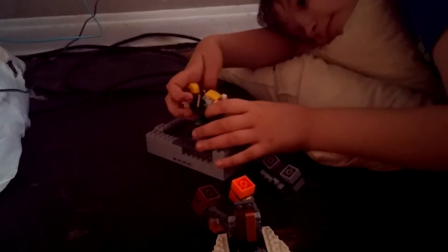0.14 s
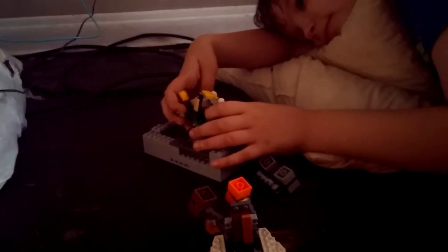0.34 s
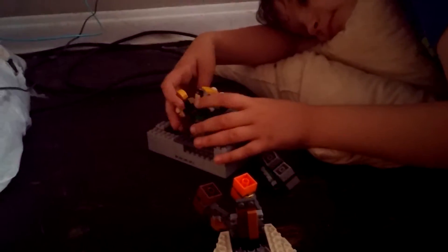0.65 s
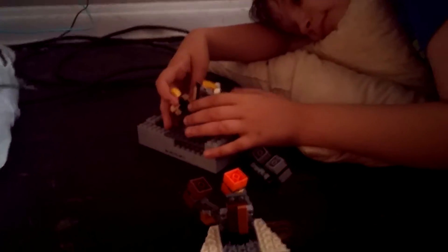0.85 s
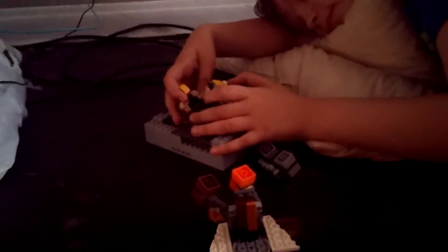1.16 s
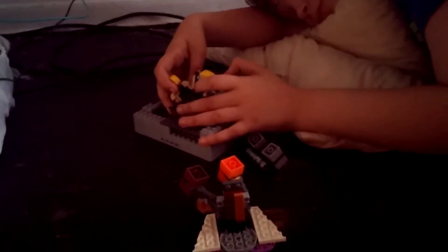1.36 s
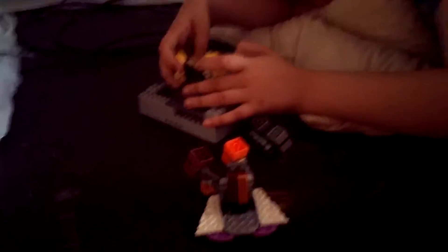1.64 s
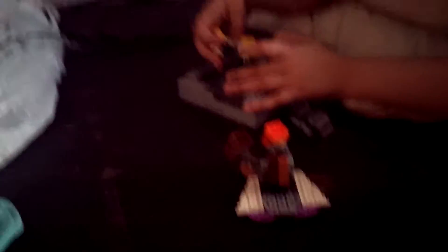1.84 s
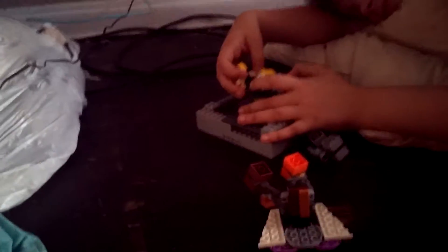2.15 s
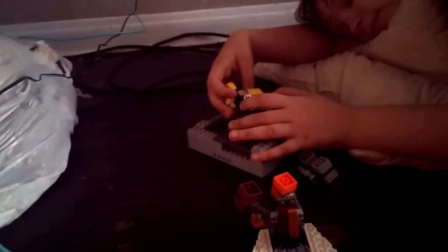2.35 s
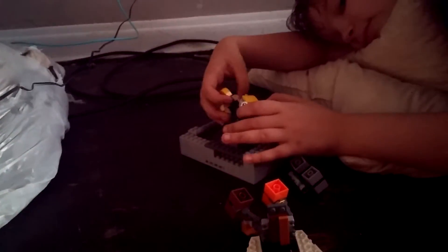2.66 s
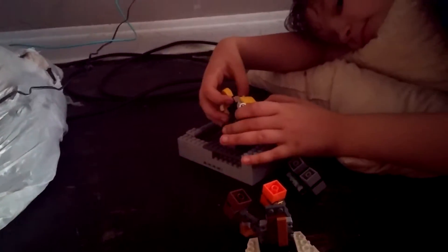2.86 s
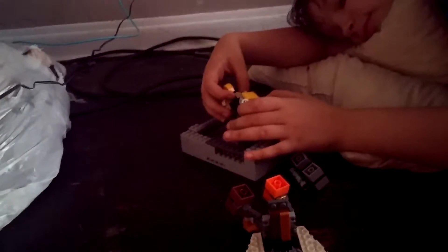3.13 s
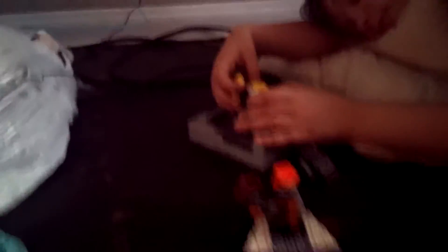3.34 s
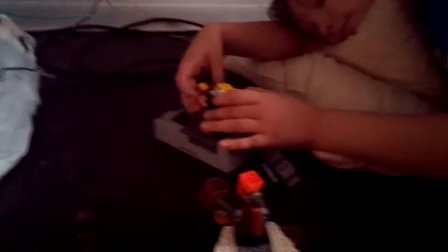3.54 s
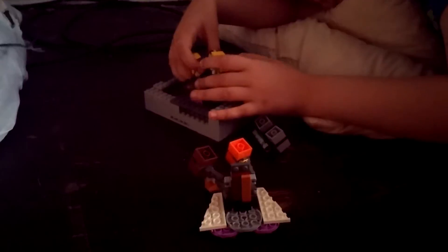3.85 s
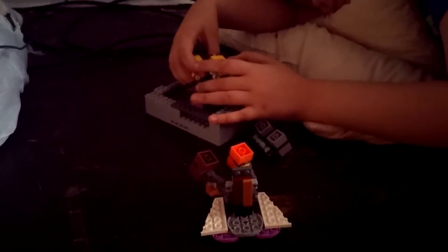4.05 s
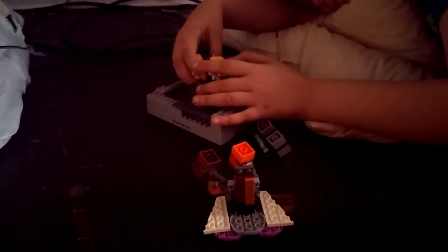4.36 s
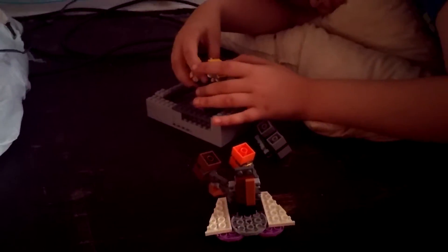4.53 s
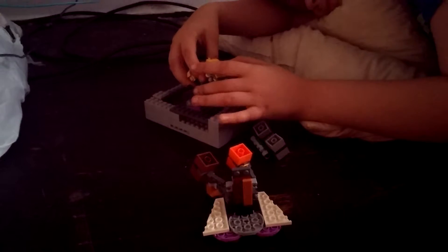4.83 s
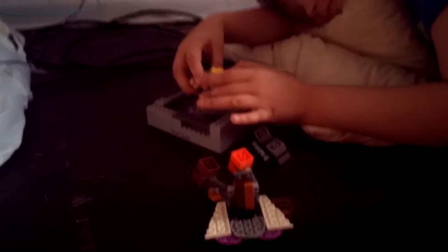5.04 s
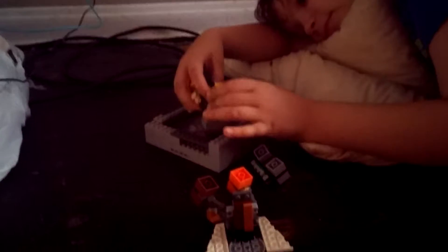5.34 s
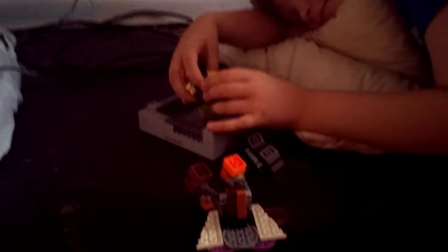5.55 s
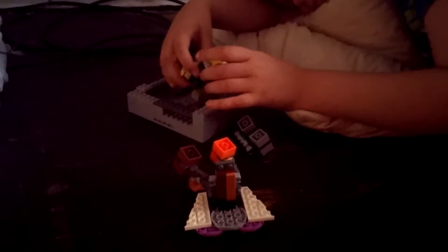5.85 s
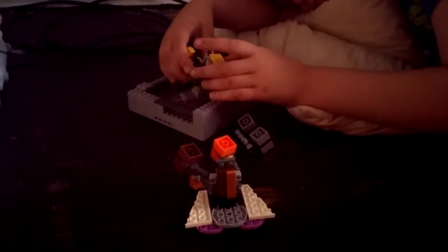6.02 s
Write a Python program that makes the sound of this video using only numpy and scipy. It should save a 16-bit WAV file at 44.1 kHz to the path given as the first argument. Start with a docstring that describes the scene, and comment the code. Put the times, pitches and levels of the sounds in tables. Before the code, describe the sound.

Over the soft, low hum of a fan and a thin hiss, plastic building bricks tick, scrape and snap together in uneven clusters, each with a slight hollow ring. Midway the clicking thins out, and dull thumps, two louder knocks and finger rubbing come from the handheld microphone, close and to the right. A few more brick snaps follow. The room sounds small and fairly dry.

```python
"""Small plastic bricks pressed onto a hollow model on the floor of a small room: snaps, ticks, scrapes.
Each contact is a chatter of edges that rings the model; studs slide and catch under the fingers.
The hand holding the camera bumps and rubs its right microphone port.
Behind it, a thin hiss rings in both ports and a fan hums low."""
import sys
import numpy as np
from scipy import signal
from scipy.fft import rfft, irfft, next_fast_len
from scipy.io import wavfile
from scipy.ndimage import map_coordinates

SR = 44100
rng = np.random.default_rng(int(sys.argv[2]) if len(sys.argv) > 2 else 0)


def log_audio(samples):
    """Write samples as a 16-bit WAV file to the path given in sys.argv[1]."""
    # one column per channel
    frames = np.atleast_2d(samples).T
    # limit to full scale, then quantise
    limited = np.clip(frames, -1, 1)
    pcm = np.round(limited * 32767).astype(np.int16)
    wavfile.write(sys.argv[1], SR, pcm)


N = 272979

# room decay: freq_hz, t60_s
ROOM_DECAY = [(200, 0.3), (2000, 0.15), (8000, 0.16), (15000, 0.049)]
# fan motor lines: freq_hz, level_db
FAN_LINES = [(59.2, -62), (80.7, -58.5), (83.2, -55), (118.5, -70.5), (166.9, -68.5), (296, -75.5),
             (339, -76.5)]
# hiss envelope: time_s, level_db
HISS_ENVELOPE = [(0.0, -48), (0.27, -45.5), (0.48, -59.5), (0.76, -58), (0.96, -48.5), (1.28, -51.5),
                 (1.62, -56.5), (2.1, -57.5), (2.52, -59.5), (2.69, -80.5), (3.1, -76), (3.33, -82.5),
                 (3.55, -77), (3.69, -69.5), (3.79, -66.5), (3.93, -51.5), (4.02, -55), (4.33, -79),
                 (4.98, -71.5), (5.22, -60), (5.74, -55.5), (5.84, -52), (6.19, -49.5)]
# right port resonance, sinks and returns: time_s, freq_hz
PORT_RESONANCE = [(0, 10220), (.8, 10230), (.95, 10020), (1.3, 10230), (2.1, 10220), (2.62, 9180),
                  (2.9, 9560), (3.15, 9320), (3.5, 9450), (3.9, 10200), (4.4, 10300), (6.19, 10250)]
# background spectra: freq_hz, density_db
FAN_AIR_SPECTRUM = [(20, -11.5), (45, 0), (80, 4), (130, -4.5), (200, -6.5), (310, -7), (450, -23.5),
                    (800, -22.5), (1500, -48.5), (5000, -47.5), (16000, -54.5)]
HISS_LEFT_SPECTRUM = [(1000, -20.5), (5000, -24), (6800, -10.5), (8100, 0.5), (9200, -4.5), (11500, -15.5),
                      (16000, -13.5)]
HISS_RIGHT_SPECTRUM = [(1000, -15.5), (5000, -24), (6800, -9), (8100, -5.5), (9700, 6), (11500, -4),
                       (13500, -11.5), (16000, -16)]

# bumps on the camera body: start_s, level_db, pitch_hz, t60_s, skin_db
BODY_BUMPS = [(1.611, -37, 101, 0.098, -73), (1.862, -15, 110, 0.073, -50), (2.297, -21.5, 111, 0.14, -47),
              (3.517, -18, 107, 0.091, -49), (3.812, -22.5, 144, 0.068, -47.5),
              (3.892, 1.5, 190, 0.012, -51), (4.0508, -1, 260, 0.006, -27)]
# finger rubs at the right port: centre_s, sigma_s, level_db, drag_rel_db, crunch_rel_db
FINGER_RUBS = [(3.931, 0.022, -39.5, 7, -7.5), (3.962, 0.028, -36.5, -4, -0.5),
               (4.035, 0.014, -36, -6.5, 9.5), (4.051, .002, -39, 15, -4), (4.306, 0.0065, -46, -16, 7),
               (4.443, 0.012, -62, -5.5, -16), (4.606, 0.018, -28, -11.5, -11),
               (4.641, .04, -46, -10.5, -26)]
# finger squeaks: centre_s, level_db, pitch_hz, octave_rel_db
FINGER_SQUEAKS = [(1.868, -39, 1094, -22), (3.526, -30, 1067, 0)]
# dry ticks of the case: start_s, level_db
CASE_TICKS = [(4.163, -21), (4.624, -16), (4.637, -12.5), (4.643, -10), (4.669, -15)]
# friction spectra of the grip: freq_hz, density_db
SKIN_SPECTRUM = [(200, -9), (1000, -11), (2400, 1.5), (4500, -11), (7000, -3), (9500, -1.5), (12000, -9),
                 (16000, -18)]
DRAG_SPECTRUM = [(25, -10.5), (120, 5), (300, -11), (700, -6.5), (1100, -11.5), (2500, -32.5)]
CRUNCH_SPECTRUM = [(1200, -19.5), (2200, -3.5), (2900, 2.5), (4300, -6), (6000, -13), (10000, -28.5)]
SIZZLE_SPECTRUM = [(1500, -43), (2600, -19), (3500, -76), (6000, -15), (8000, -2.5), (10000, -1),
                   (12000, -10), (16000, -26.5)]

# strokes of studs over studs: centre_s, sigma_s, level_db, resonance_hz
STUD_STROKES = [(0.013, 0.033, -23, 1840), (0.202, 0.021, -41, 1310), (0.282, 0.098, -54, 2760),
                (0.747, 0.0079, -48, 1970), (0.898, 0.027, -37.5, 1960), (1.088, 0.033, -46.5, 1892),
                (1.907, 0.01014, -39.5, 3400), (2.919, 0.007, -47, 2830), (3.787, 0.017, -44, 2760),
                (5.02, .0065, -53.5, 1370), (5.518, 0.044, -58.5, 1390), (5.78, 0.021, -51, 1660),
                (5.894, 0.027, -46, 1850)]
# brick presses: snap_s, level_db, hollow_rel_db, ring_hz, slide_s (touch to snap; 0 = plain tap)
BRICK_PRESSES = [(0.0175, -12, -7.5, 2120, 0), (0.0615, -24.5, 5.5, 1903, 0.014),
                 (0.1479, -32.5, 3, 1545, 0.00024), (0.19, -19, -4, 1543, 0.001),
                 (0.3461, -29.5, -0.5, 1840, .008), (0.4389, -41, -8, 1885, 0),
                 (0.9362, -23, -4.5, 1704, .0135), (1.185, -17.5, -4.5, 1827, 0.0025),
                 (1.2349, -29.5, -1.5, 1402, .031), (1.3504, -10, -19, 1955, .02),
                 (1.4381, -27.5, -14, 2110, .01), (1.9346, -24.5, -4.5, 1800, 0.0025),
                 (2.0718, -35, -16, 1750, 0), (2.1014, -14.5, -12.5, 1430, .008),
                 (2.141, -13, -2.5, 1845, 0.026), (2.4546, -13.5, -16.5, 1290, .0095),
                 (2.4655, -10.5, -9, 2150, 0), (2.6737, -42, 0, 1870, 0), (2.8662, -59, -3, 1450, 0),
                 (3.0847, -67, -15, 1444, 0), (3.7463, -60, -15, 2460, 0.00098),
                 (4.0384, -25.5, -3.5, 1487, 0.022), (4.131, -30.5, -9, 1455, 0.00046),
                 (4.2825, -40, -6.5, 1550, 0.00029), (4.3016, -38, -4.5, 1510, 0),
                 (5.1056, -24, 1, 2034, .0095), (5.287, -56.5, -3, 1360, 0),
                 (5.333, -57, -17, 1600, 0.00032), (5.4335, -26, 1.5, 2174, .01),
                 (5.593, -41, -16, 1780, 0.00023), (5.708, -36, -9, 1520, 0.00051),
                 (5.7455, -15.5, -10, 1840, .0125), (5.8621, -32, 4.5, 2002, 0),
                 (5.9655, -51.5, -5.5, 1900, 0), (6.0245, -41.5, -10, 1600, 0.00038),
                 (6.1481, -46.5, -4.5, 1780, 0)]
# modes of the hollow model: ring_ratio, level_db, t60_s
MODEL_MODES = [(.74, -9.5, 0.044), (0.849, 3.5, 0.017), (0.928, -5, 0.033), (1, 4.5, 0.043),
               (1.1, -8.5, 0.027), (1.22, -8.5, 0.027), (1.452, -4.5, 0.046), (1.68, -8.5, 0.013)]
# brick contact spectra: freq_hz, density_db
STUD_SPECTRUM = [(300, -19.5), (950, -14), (1400, -2.5), (2500, 1.5), (3600, -4.5), (5500, -4.5), (8000, 3),
                 (11000, -11), (16000, -18.5)]
SNAP_SPECTRUM = [(60, -29), (150, -11), (250, 1.5), (450, -37), (1050, -13.5), (1500, -3), (2800, 8.5),
                 (4500, 0.5), (6200, -1), (8000, -21.5), (15000, -42)]
EDGE_SPECTRUM = [(3000, -52), (6000, -13.5), (7800, 1), (9000, -7), (11000, -20), (13000, -23),
                 (16000, -30.5)]


def amp(db):
    """Decibels to gain."""
    return 10 ** (np.asarray(db) / 20)


def unit(x):
    """Scale to rms 1."""
    return x / np.sqrt(np.mean(x ** 2) + 1e-20)


def along(points, hz):
    """Read (freq_hz, value) points on a log frequency axis."""
    freqs_hz, values = np.transpose(points)
    return np.interp(np.log(hz + 1), np.log(freqs_hz + 1), values)


def curve(rows):
    """(time_s, value) rows to one value per sample."""
    return np.interp(np.arange(N) / SR, *np.transpose(rows))


def wobble(rate_hz):
    """Smooth curve through random knots."""
    knots = rng.standard_normal(int(N * rate_hz / SR) + 4)
    return map_coordinates(knots, [np.arange(N) * rate_hz / SR])


def fade(t, t60_s):
    """Exponential decay."""
    return np.exp(-np.log(1000) * t / t60_s)


def swell(centre_s, sigma_s):
    """Gaussian envelope."""
    return np.exp(-.5 * ((np.arange(N) / SR - centre_s) / sigma_s) ** 2)


def colour(x, spectrum, size=4096):
    """Minimum-phase filter of unit energy, shaped by (freq_hz, level_db) points."""
    cepstrum = irfft(np.log(amp(along(spectrum, np.fft.rfftfreq(size, 1 / SR)))))
    cepstrum[1:size // 2] *= 2
    cepstrum[size // 2 + 1:] = 0
    kernel = irfft(np.exp(rfft(cepstrum)))
    return signal.fftconvolve(x, kernel / np.linalg.norm(kernel))[:len(x)]


def noise(spectrum):
    """Coloured noise, rms 1."""
    return unit(colour(rng.standard_normal(N), spectrum))


def grains(rate_hz, spread_db=3):
    """Tiny slips of uneven size at random times, rms 1."""
    hits = rng.random(N) < rate_hz / SR
    return unit(hits * rng.standard_normal(N) * amp(spread_db * rng.standard_normal(N)))


def add(track, start_s, sound):
    """Mix a sound into a track."""
    part = track[..., max(round(start_s * SR), 0):][..., :sound.shape[-1]]
    part += sound[..., :part.shape[-1]]


def room(x, scatter_db=3, tail_db=1, scatter_t60_s=.017, size=16384):
    """Direct sound, scatter from hands and floor, and room tail at two microphones."""
    hz, frames_s, bins = signal.stft(rng.standard_normal((2, size)), SR, nperseg=256)
    bins = bins * fade(frames_s, along(ROOM_DECAY, hz)[:, None])
    early = fade(np.arange(size) / SR, scatter_t60_s)
    tail = signal.istft(bins, SR, nperseg=256)[1][:, :size] * (1 - early)
    scatter = rng.standard_normal((2, size)) * early
    response = (amp(scatter_db) * unit(scatter) + amp(tail_db) * unit(tail)) / np.sqrt(size)
    response[:, 0] += 1
    return signal.fftconvolve(x[None], response, axes=1)[:, :N]


def fan(air_db=-61, left_db=-3, right_db=0.5, width=0.88):
    """Slightly unsteady motor lines over a low rush of air."""
    t, hum = np.arange(N) / SR, np.zeros(N)
    for hz, db in FAN_LINES:
        drift_rad, swing_db = .3 * wobble(2), wobble(2)
        phase = 2 * np.pi * (hz * t + rng.random()) + drift_rad
        hum += np.sqrt(2) * amp(db + swing_db) * np.sin(phase)
    mid, side = noise(FAN_AIR_SPECTRUM), width * noise(FAN_AIR_SPECTRUM)
    air = amp(air_db) * np.array([mid + side, mid - side])
    return amp([[left_db], [right_db]]) * (hum + air)


def port_hiss(contacts, left_db=-3.5, right_db=2.5, flare_db=-42, knee_db=-22, release_s=0.014):
    """Thin hiss that flares after each contact and sinks in the pauses."""
    left, right = noise(HISS_LEFT_SPECTRUM), noise(HISS_RIGHT_SPECTRUM)
    pole = np.exp(-1 / (release_s * SR))
    follower = signal.lfilter([1 - pole], [1, -pole], np.abs(contacts))
    flare = amp(flare_db) * np.sqrt(follower / (follower + amp(knee_db)))
    level = np.hypot(amp(curve(HISS_ENVELOPE)), flare)
    return level * np.array([amp(left_db) * left, amp(right_db) * right])


def port_ring(x, width_hz=250):
    """The band picked out by the right port's narrow, drifting resonance."""
    carrier = np.exp(2j * np.pi * np.cumsum(curve(PORT_RESONANCE)) / SR)
    lowpass = signal.butter(2, width_hz / 2, fs=SR, output="sos")
    return 2 * np.real(carrier * signal.sosfilt(lowpass, x * carrier.conj()))


def body_bumps(leak_hz=75):
    """Damped thumps of the hand on the camera; the port leaks away slow pressure."""
    out, t = np.zeros(N), np.arange(SR // 4) / SR
    for start_s, db, hz, t60_s, _ in BODY_BUMPS:
        add(out, start_s, amp(db) * np.sin(2 * np.pi * hz * t) * fade(t, t60_s))
    return signal.sosfilt(signal.butter(1, leak_hz, "highpass", fs=SR, output="sos"), out)


def skin_friction(bump_drag_db=-24.5, bump_crunch_db=-9.5):
    """Skin brush, low drag and case crunch at each bump and rub."""
    spectra = SKIN_SPECTRUM, DRAG_SPECTRUM, CRUNCH_SPECTRUM
    skin, drag, crunch = (unit(colour(grains(rate_hz=5000), spectrum)) for spectrum in spectra)
    out = np.zeros(N)
    for start_s, db, _, t60_s, skin_db in BODY_BUMPS:
        brush_s = .06 * t60_s  # softer bumps brush longer
        brush = amp(skin_db) * (skin + amp(bump_crunch_db) * crunch)
        out += swell(start_s + brush_s, .0011 + brush_s) * (brush + amp(db + bump_drag_db) * drag)
    for centre_s, sigma_s, db, drag_db, crunch_db in FINGER_RUBS:
        rub = skin + amp(drag_db) * drag + amp(crunch_db) * crunch
        out += amp(db) * swell(centre_s, sigma_s) * rub
    return out


def finger_squeaks(sizzle_db=-5, third_harmonic_db=-19, sigma_s=.0055):
    """A finger sticks and slips: a jittery tone with skin sizzle."""
    out = np.zeros(N)
    for centre_s, db, hz, octave_db in FINGER_SQUEAKS:
        phase = 2 * np.pi * np.cumsum(hz * (1 + .05 * wobble(700))) / SR
        tone = np.sin(phase) + amp(octave_db) * np.sin(2 * phase)
        tone += amp(third_harmonic_db) * np.sin(3 * phase)
        out += amp(db) * swell(centre_s, sigma_s) * (tone + amp(sizzle_db) * noise(SIZZLE_SPECTRUM))
    return out


def case_ticks(pitch_hz=10500, t60_s=.001):
    """The gripped case gives dry, high ticks."""
    out, t = np.zeros(N), np.arange(SR // 4) / SR
    for start_s, db in CASE_TICKS:
        add(out, start_s, amp(db) * np.cos(2 * np.pi * pitch_hz * t) * fade(t, t60_s))
    return out


def uneven(spectrum, depth_db):
    """Chance peaks and dips: every grip on a brick favours other resonances."""
    hz = np.concatenate([np.geomspace(60, 1000, 11, endpoint=False), np.geomspace(1000, SR / 2, 45)])
    return np.column_stack([hz, along(spectrum, hz) + depth_db * rng.standard_normal(len(hz))])


def touch_db(press_db):
    """A harder press begins with a somewhat firmer touch."""
    return -18 + .42 * press_db


def stud_scrapes(level_db=-7.5, flutter_db=2, hollow_db=-0.5, fidget_db=-14,
                 settle_db=-16, settle_lag_s=.017, settle_hz=2620):
    """Studs slide and catch in strokes and at each press, ringing the model; faint ticks between."""
    settling = np.zeros(N)
    for snap_s, db, _, _, slide_s in BRICK_PRESSES:
        envelope = swell(snap_s + settle_lag_s - slide_s, .0076 + slide_s / 2)
        settling += amp(min(db, touch_db(db)) + settle_db) * envelope
    strokes = [(amp(db) * swell(centre_s, sigma_s), hz) for centre_s, sigma_s, db, hz in STUD_STROKES]
    fidget = unit(colour(grains(rate_hz=60), STUD_SPECTRUM))
    out = amp(curve(HISS_ENVELOPE) + fidget_db) * fidget
    for pressure, hz in strokes + [(settling, settle_hz)]:
        slips = grains(rate_hz=600)
        hollow = signal.lfilter(*signal.iirpeak(hz, Q=12, fs=SR), slips)
        ticks = unit(colour(slips, uneven(STUD_SPECTRUM, depth_db=3)))
        out += pressure * (ticks + amp(hollow_db) * unit(colour(hollow, STUD_SPECTRUM)))
    return room(out * amp(level_db + flutter_db * wobble(40)))


def brick_contact(db, hollow_db, ring_hz, snap_db=-21, ring_db=-21, rebound_db=-15,
                  chatter_t60_s=.0074, size=4096):
    """A brief chatter of edges with three tiny rebounds; the hollow model rings."""
    t = np.arange(size) / SR
    force = fade(t, chatter_t60_s) * (1 - fade(t, .0033))
    for delay_s in rng.uniform(.0027, .02, 3):
        rebound = (t > delay_s) * fade(np.abs(t - delay_s), chatter_t60_s)
        force += amp(rebound_db) * fade(delay_s, .24) * rebound
    chatter = rng.standard_normal(size) * force
    ring = np.zeros(size)
    for ratio, mode_db, t60_s in MODEL_MODES:
        hz = ring_hz * ratio * rng.normal(1, .0082)  # fingers detune the model at every touch
        envelope = amp(mode_db + rng.normal(0, 2.5)) * fade(t, t60_s)
        ring += envelope * np.sin(2 * np.pi * (hz * t + rng.random()))
    edge_db = -25 + .75 * max(-36 - db, 0)  # light contacts are mostly edge
    click = amp(snap_db) * unit(colour(chatter, uneven(SNAP_SPECTRUM, depth_db=3.5)))
    click += amp(edge_db) * unit(colour(chatter, EDGE_SPECTRUM))
    click += amp(ring_db + hollow_db) * unit(ring * (1 - fade(t, .01)))
    return amp(db) * room(click)


def brick_presses():
    """A pressed brick touches, then snaps home; a tapped one makes a single contact."""
    out = np.zeros((2, N))
    for snap_s, db, hollow_db, ring_hz, slide_s in BRICK_PRESSES:
        add(out, snap_s, brick_contact(db, hollow_db, ring_hz))
        if slide_s > 0:
            add(out, snap_s - slide_s, brick_contact(touch_db(db), hollow_db, ring_hz))
    return out


def scene(port_ring_db=9, bricks_to_ring_db=-22, grip_room_db=-37):
    """Each port colours the bricks differently; the grip is on the right and faintly in the room."""
    left, right = brick_presses() + stud_scrapes()
    hiss_left, hiss_right = port_hiss(right)
    grip = body_bumps() + skin_friction() + finger_squeaks() + case_ticks()
    left = amp(-3.5) * colour(left, [(200, -6), (1800, -6.5), (2700, -16.5), (4500, -2),
                                     (6500, -6.5), (8000, 2.5), (10000, -2.5), (16000, -1)])
    right = amp(0.5) * colour(right, [(200, 3.5), (1800, 2.5), (3000, 0), (4500, 0),
                                      (8000, -2.5), (10000, 11), (16000, 4.5)])
    ring = amp(port_ring_db) * port_ring(hiss_right + amp(bricks_to_ring_db) * right)
    ports = np.array([left + hiss_left, right + hiss_right + ring + grip])
    return ports + amp(grip_room_db) * room(grip) + fan()


def record(dry, cutoff_hz=15900):
    """The camera's sharp band limit."""
    size = next_fast_len(N + SR // 2)
    passband = np.fft.rfftfreq(size, 1 / SR) < cutoff_hz
    return irfft(rfft(dry, size) * passband, size)[:, :N]


dry = scene()
out = record(dry)
log_audio(out)
```